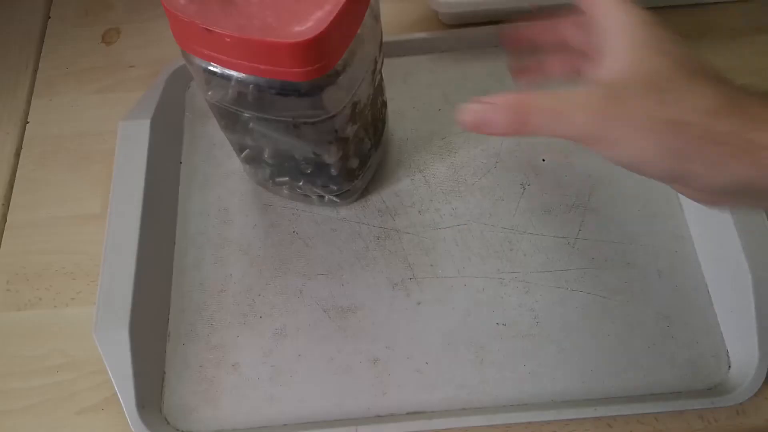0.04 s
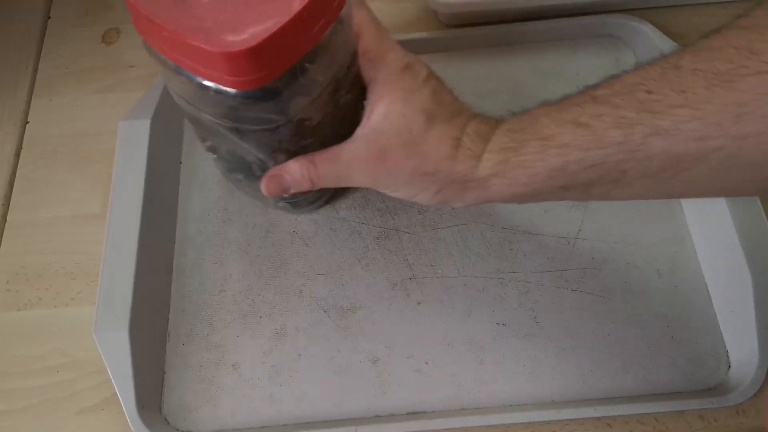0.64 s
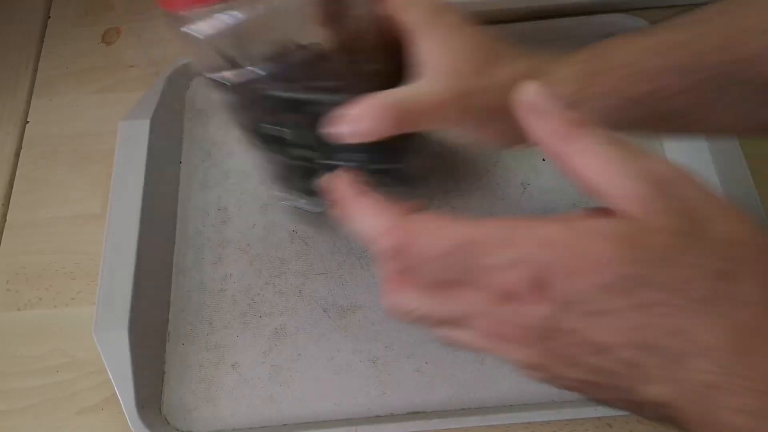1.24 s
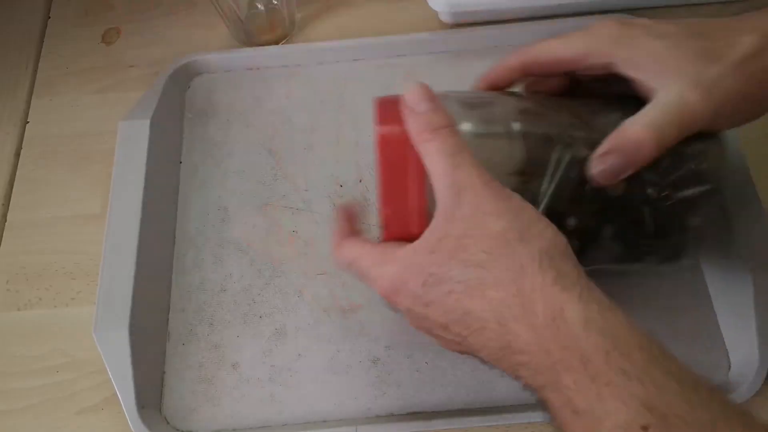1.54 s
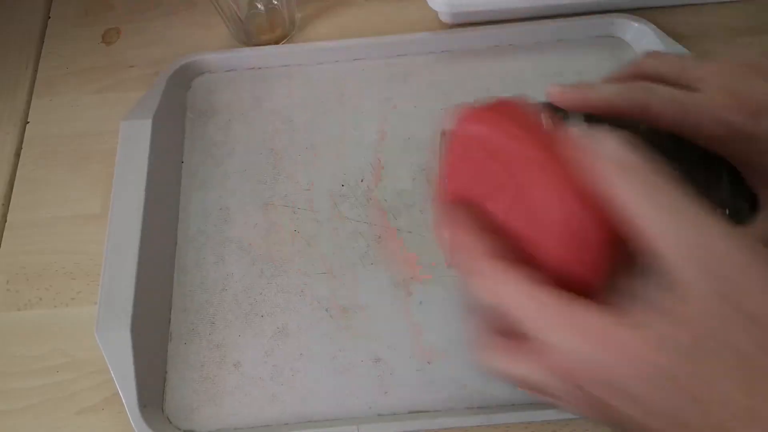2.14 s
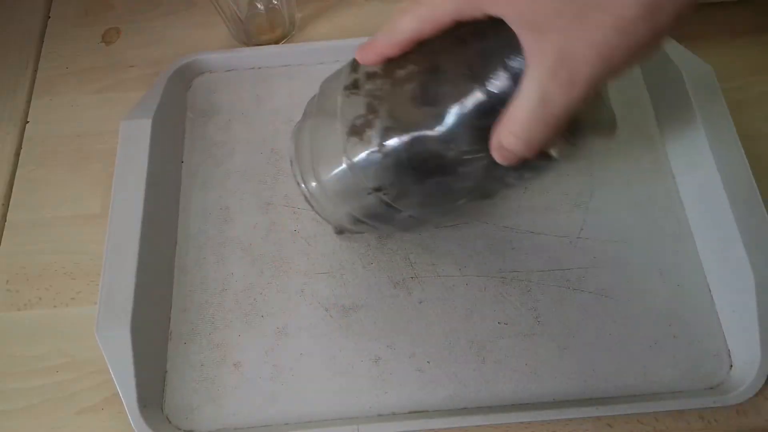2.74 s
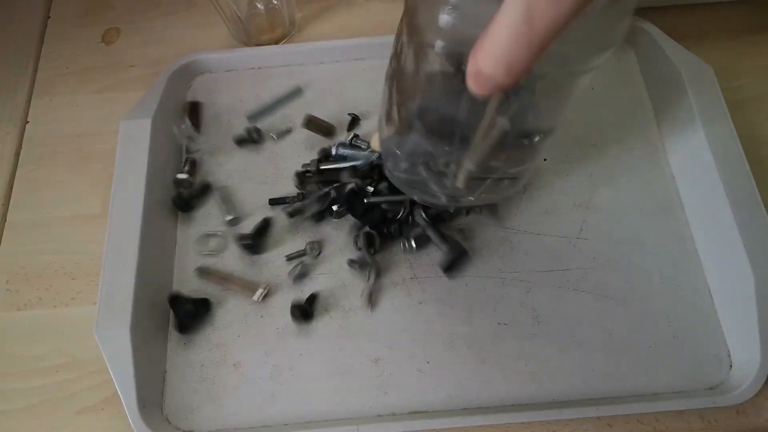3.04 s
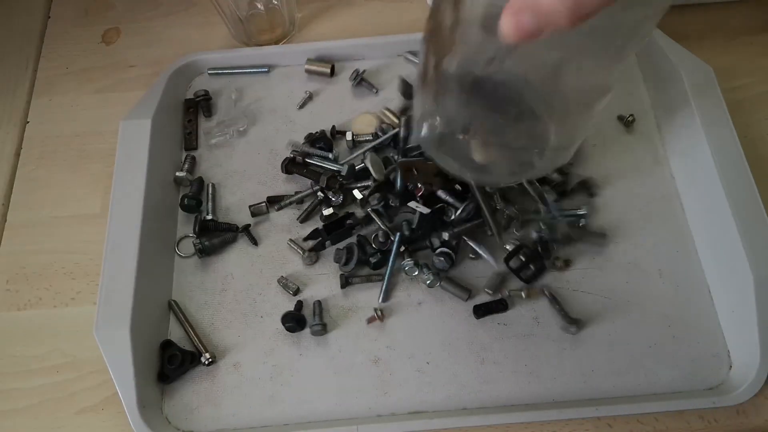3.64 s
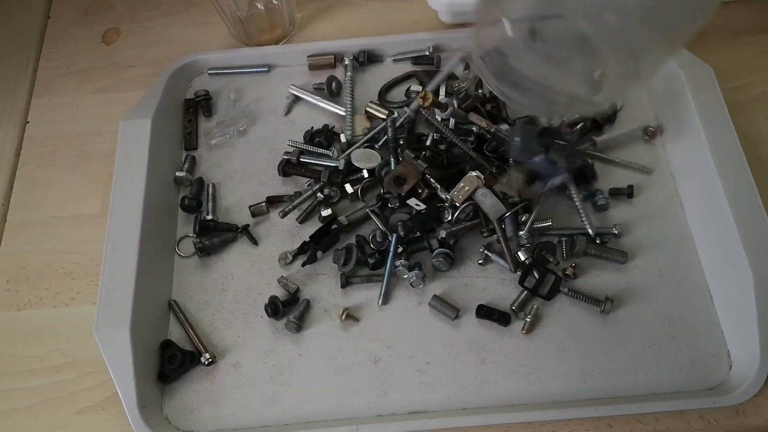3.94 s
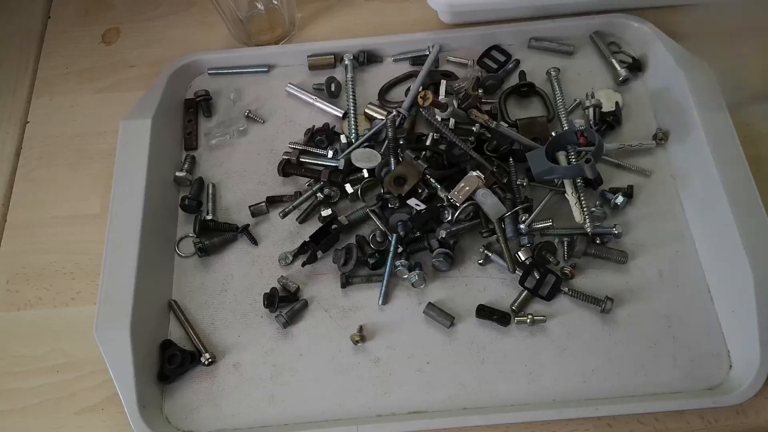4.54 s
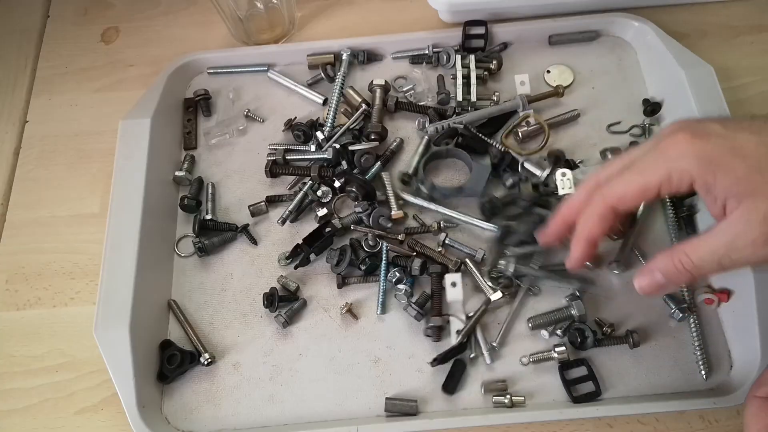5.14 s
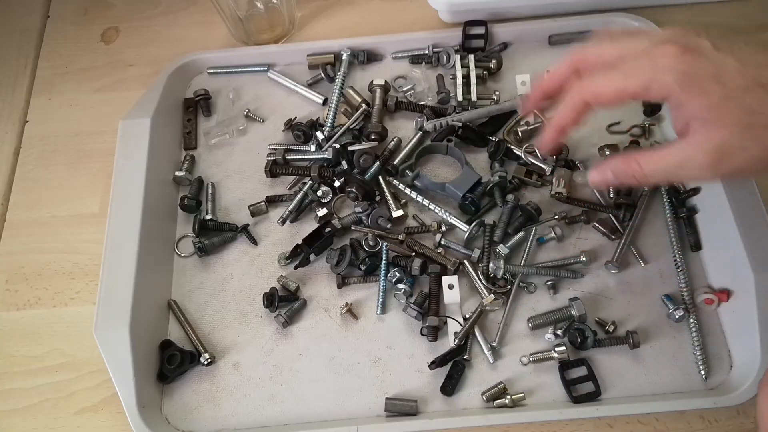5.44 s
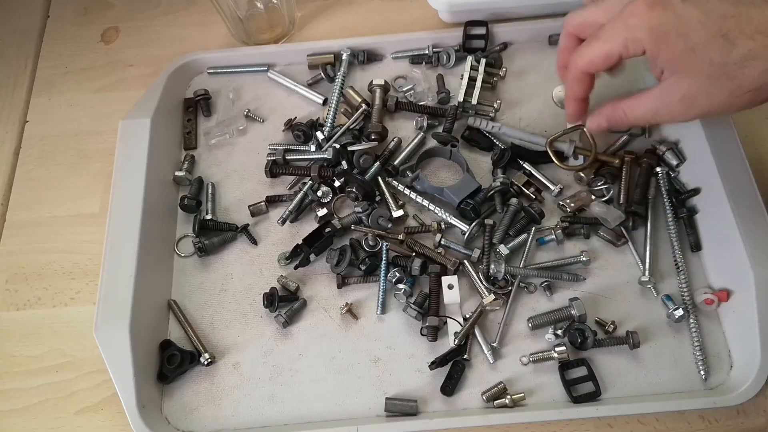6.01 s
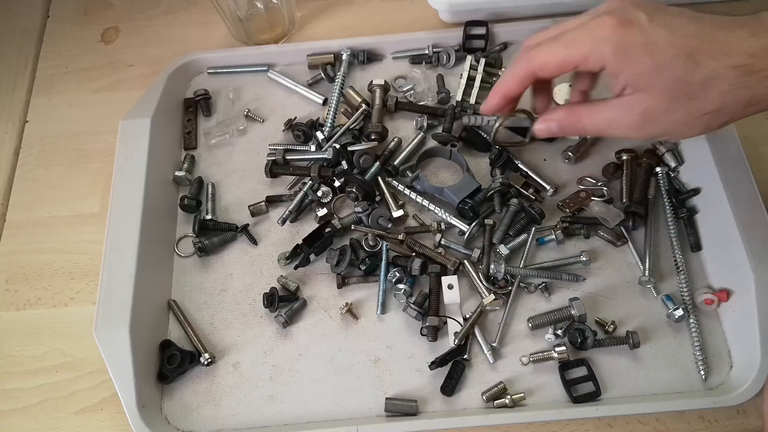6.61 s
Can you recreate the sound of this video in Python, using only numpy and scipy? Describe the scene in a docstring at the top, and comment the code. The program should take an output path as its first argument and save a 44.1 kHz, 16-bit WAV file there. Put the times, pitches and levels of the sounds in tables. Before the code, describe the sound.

Heard close up in a small, echoing room, a plastic jar full of metal hardware is handled with faint grating, clicks and hollow bumps. The contents then spill onto a plastic tray in a dense, jingling rush, the loudest part, which thins to a few last pieces dropping. A short pause follows before fingers push through the pile, making separate rattles, sharp clicks and the thin ring of loose bolts and washers.

```python
"""In a small, echoing room, a plastic jar of screws is gripped, tipped over, opened and poured
onto a plastic tray; a hand then stirs the heap. Countless small collisions tick in the metal
and knock on jar and tray, and now and then a free bolt or washer rings.
The sound is close and mono, and a limiter holds down the loudest part of the pour."""
import sys
import numpy as np
from scipy import signal
from scipy.fft import rfft, irfft
from scipy.io import wavfile
from scipy.ndimage import uniform_filter1d, minimum_filter1d

SR = 44100
rng = np.random.default_rng(int(sys.argv[2]) if len(sys.argv) > 2 else 0)


def transcribe(signal):
    """Save signal, clipped to [-1, 1], as a 16-bit WAV file at the path in sys.argv[1]."""
    frames = np.atleast_2d(signal).T
    limited = np.clip(frames, -1, 1)
    pcm = np.round(limited * 32767).astype(np.int16)
    wavfile.write(sys.argv[1], SR, pcm)


N = 302967
T = np.arange(N) / SR
POUR_S, STIR_S = 2.76, 4.7  # the screws leave the jar; the tray lies covered

# tone colour of clicking steel: (frequency [Hz], level [dB])
STEEL_TONE = [(500, -22), (1500, -11), (2800, -7.5), (4500, -7.5), (6800, -6), (8200, -4.5), (9350, 1),
              (10400, -6), (12000, -11.5), (14200, -14), (15000, -17.5), (15450, -7), (15900, -28.5),
              (16500, -13)]
# tone colours of a knock on the jar, the bare tray and the covered tray: (frequency [Hz], level [dB])
JAR_TONE = [(100, -55), (300, -29.5), (560, 1.5), (760, 4), (930, 1), (1150, 1.5), (1500, -1.5), (2100, -6),
            (3200, -5), (8000, -21.5)]
BARE_TRAY_TONE = [(100, -27), (300, -15.5), (560, -9.5), (650, 0), (736, -1), (810, -6.5), (887, -2),
                  (970, -2.5), (1065, -1), (1420, -3.5), (1700, -6), (2500, -3.5), (4000, -2.5),
                  (8000, -21)]
FULL_TRAY_TONE = [(100, -46), (300, -7), (560, -7), (800, -1.5), (1050, -1), (1700, -2), (2500, -2),
                  (4000, -8.5), (8000, -27)]


def screws(metal_db, knock_db, weight_db, loose_db=-44, sliding_db=-54):
    """The same collisions tick in the steel, knock on the plastic and make it rumble."""
    # low tones of jar, bare tray and covered tray under the load: (frequency [Hz], level [dB])
    jar_low = [(25, -15), (70, -22), (150, -27), (210, -10.5), (275, -6), (350, 2), (470, -6), (700, -10),
               (1500, -33.5)]
    bare_tray_low = [(25, -14.5), (60, -8), (150, -8), (200, -1.5), (234, 3.5), (285, -4), (370, 4),
                     (450, 3), (700, -12.5), (1500, -40)]
    full_tray_low = [(25, -9), (100, -13.5), (220, -3), (290, -12), (350, 7.5), (460, 3.5), (700, -23),
                     (1500, -31)]
    energy = collisions(metal_db)
    steel_power, knock_power = amp(metal_db) ** 2, amp(knock_db) ** 2
    # packed screws only grate; they ring once they tumble loose
    loose = np.minimum(1, amp(metal_db - loose_db))
    ringing = amp(1.5) * loose * clinks(energy * steel_power, t60=.04, low_hz=7500, high_hz=16000)
    clacking = amp(-4) * clinks(energy * knock_power, t60=.03, low_hz=700, high_hz=2200)
    # gentle motion is a smooth rub; harder motion breaks into collisions
    grainy = np.minimum(1, amp(metal_db - sliding_db))
    friction = grainy * energy + 1 - grainy
    ticks = amp(-4.5) * (fading_noise(friction * steel_power, t60=.008) + ringing)
    knocks = amp(-4.5) * (fading_noise(friction * knock_power, t60=.012) + clacking)
    # the heavy load blurs many collisions into one uneven push
    pushes = amp(-5.5) * fading_noise(friction, t60=0.023) * amp(weight_db)
    rumble = plastic(pushes, jar_low, bare_tray_low, full_tray_low)
    return colour(ticks, STEEL_TONE) + plastic(knocks) + rumble


def collisions(level_db, busiest_per_s=2000, spread_db=2.0, thinning=.15):
    """The energy of each collision; the louder the heap, the more screws collide."""
    per_s = busiest_per_s * amp(thinning * (level_db - level_db.max()))
    strength = amp(spread_db * np.minimum(rng.exponential(1, N), 4))
    energy = strength ** 2 * (rng.random(N) < per_s / SR)
    # the screws share the energy that the hand puts in
    average = uniform_filter1d(uniform_filter1d(energy, size=1100), size=700)
    return energy / (abs(average) + 0.37 * per_s / SR)


def fading_noise(energy, t60):
    """Each collision wakes many tones, heard as noise that fades by 60 dB in t60 seconds."""
    energy_left = amp(-120 / (t60 * SR))  # after one sample
    power = signal.lfilter([1 - energy_left], [1, -energy_left], energy)
    return rng.standard_normal(N) * np.sqrt(power)


def clinks(energy, t60, low_hz, high_hz):
    """About half the collisions ring one short tone, set by the piece and the spot it strikes."""
    out, t = np.zeros(N), np.arange(2500) / SR
    chance, spot, freedom = rng.random((3, N))
    for i in np.flatnonzero((energy > 0) & (chance < .5)):
        hz = low_hz + (high_hz - low_hz) * spot[i]
        ring_s = t60 * (.5 + freedom[i])
        tone = np.sin(2 * np.pi * hz * t) * amp(-60 * t / ring_s)
        add(out, i / SR, np.sqrt(energy[i] / np.sum(tone ** 2)) * tone)
    return out


def motion(faint_rub_db=-88):
    """Levels of metal, knocking and weight (dB) as the screws are shifted, poured and stirred."""
    # the load slides in the jar: (time [s], length [s], metal [dB], knocking [dB], weight [dB])
    jar_shifts = [(.17, 0.2, -73, -88, -88), (.392, 0.047, -53, -61.5, -59.5), (.50, 0.19, -65, -87, -84),
                  (.725, 0.097, -60, -73, -72), (.89, 0.022, -64.5, -66.5, -72), (.98, 0.13, -70, -93, -86),
                  (1.11, 0.023, -59.5, -66.5, -69), (1.20, 0.042, -56.5, -67, -64.5),
                  (1.365, 0.053, -54, -63.5, -73), (1.45, 0.016, -45.5, -45.5, -50.5),
                  (1.565, 0.0064, -50.5, -49.5, -49), (1.64, 0.17, -48.5, -58.5, -53),
                  (1.785, 0.14, -40, -49.5, -46), (1.99, 0.034, -36, -50, -44.5),
                  (2.10, 0.058, -45.5, -63, -62), (2.17, .04, -46.5, -56, -52.5),
                  (2.24, 0.076, -42, -53, -50.5), (2.46, 0.1, -53.5, -67.5, -60.5),
                  (2.60, 0.14, -46, -57, -55)]
    # the heap is pushed on the tray: (time [s], length [s], metal [dB], knocking [dB], weight [dB])
    tray_stirs = [(4.52, .11, -65.5, -72.5, -74), (4.97, 0.028, -46.5, -51.5, -68),
                  (5.06, 0.23, -35, -41, -55), (5.385, 0.0084, -45, -50.5, -58),
                  (5.54, 0.0065, -67, -63.5, -82), (5.78, 0.11, -35.5, -44.5, -60),
                  (6.005, 0.011, -41, -52.5, -59), (6.305, 0.016, -39.5, -47, -67),
                  (6.51, .012, -57, -54.5, -67), (6.635, .03, -54, -61, -53), (6.705, .008, -49, -62, -70),
                  (6.86, .01, -69, -59, -65)]
    shifting = hand_moves(jar_shifts, rise_db_per_s=473, rest_db_per_s=193)
    stirring = hand_moves(tray_stirs, rise_db_per_s=644, rest_db_per_s=326)
    return 10 * np.log10(shifting + pour() + stirring + amp(faint_rub_db) ** 2)


def pour(rise_db_per_s=600, rest_db_per_s=30):
    """Power of metal, knocking and weight in the stream of screws."""
    # the screws leave the jar in two surges: (time [s], metal [dB], knocking [dB], weight [dB])
    stream = [(2.755, -43, -47, -52), (2.78, -36, -38, -39), (2.87, -24.5, -28, -35),
              (3.0, -22.5, -31, -36), (3.15, -27.5, -30.5, -44), (3.26, -32.5, -36.5, -46.5),
              (3.34, -32, -37, -46), (3.39, -42, -41, -60.5), (3.443, -28, -36, -46.5),
              (3.62, -24.5, -30.5, -40.5), (3.85, -26, -32.5, -43.5), (3.93, -33, -38.5, -50.5),
              (4.02, -36.5, -44, -57), (4.15, -42.5, -42, -56), (4.24, -64, -64, -63),
              (4.34, -70.5, -73, -80)]
    times, *levels_db = np.transpose(stream)
    before, after = np.maximum(times[0] - T, 0), np.maximum(T - times[-1], 0)
    fade_db = -rise_db_per_s * before - rest_db_per_s * after
    return amp([np.interp(T, times, db) + fade_db for db in levels_db]) ** 2


def hand_moves(rows, rise_db_per_s, rest_db_per_s, sag_db_per_s=4.5):
    """Power of metal, knocking and weight as each move swells, sags a little and comes to rest."""
    power = np.zeros((3, N))
    for s, length, *levels_db in rows:
        before, after = np.maximum(s - T, 0), np.maximum(T - s - length, 0)
        during = np.clip(T - s, 0, length)
        shape = amp(-rise_db_per_s * before - sag_db_per_s * during - rest_db_per_s * after)
        power += np.outer(amp(levels_db), shape) ** 2
    return power


def hard_hits(other_end_s=.003, other_end_db=-4.5):
    """A heavy piece lands: a bright click and a slightly longer knock."""
    # single hard landings: (time [s], metal click [dB], knock on the plastic [dB])
    landings = [(.377, -49, -56), (.483, -44.5, -67), (.709, -50, -62), (1.13, -66, -58),
                (1.318, -45.5, -60), (1.369, -65, -56), (1.4043, -35.5, -31.5), (1.552, -31.5, -51),
                (1.652, -42, -60), (1.770, -28.5, -42.5), (1.86, -32, -38.5), (2.037, -40, -58),
                (2.161, -36.5, -61), (2.224, -27.5, -39.5), (2.493, -35.5, -61), (2.594, -36.5, -45),
                (2.762, -27.5, -38), (3.120, -21, -37), (3.971, -23.5, -50), (4.053, -29, -34.5),
                (4.097, -25, -58), (4.138, -29.5, -39.5), (4.205, -35, -43), (4.273, -44.5, -46),
                (4.876, -55.5, -86), (4.916, -47, -57), (4.96, -42, -53), (5.037, -36, -48),
                (5.056, -26, -41.5), (5.372, -48, -42), (5.379, -31, -45.5), (5.524, -36.5, -64),
                (5.728, -47.5, -48.5), (5.752, -38, -44), (5.779, -29, -35), (5.841, -28, -57),
                (5.9943, -31.5, -44.5), (6.277, -53, -51), (6.294, -39, -42), (6.499, -45, -56),
                (6.604, -27, -34.5), (6.652, -27.5, -35), (6.701, -36.5, -41.5), (6.763, -37.5, -38.5),
                (6.810, -49, -60)]
    clicks, knocks = np.zeros((2, N))
    for s, click_db, knock_db in landings:
        ends = [(s, 0)]
        if s > POUR_S:  # on the tray a screw lands on one end, then on the other
            ends.append((s + other_end_s, other_end_db))
        for at, end_db in ends:
            add(clicks, at, amp(click_db + end_db) * contact(t60=0.024))
            add(knocks, at, amp(knock_db + end_db) * contact(t60=0.039))
    return amp(-2.5) * colour(clicks, STEEL_TONE) + amp(-0.5) * plastic(knocks)


def contact(t60, rise_s=0.00063):
    """One hard touch: a burst of noise that swells in a moment and dies away."""
    t = np.arange(2048) / SR
    return rng.standard_normal(len(t)) * amp(-60 * t / t60) * (1 - np.exp(-t / rise_s))


def rings(metal_db, touches_per_s=500, first_blow=1.3, touch_t60=.07):
    """A loose piece is struck, then chatters on its neighbours; each touch rings its note again."""
    # bolts, washers and the hollow jar ring: (time [s], pitch [Hz], level [dB], rattle time [s])
    clear_rings = [(1.447, 1155, -40, 0.19), (1.46, 2040, -43, 0.1), (1.83, 9060, -39, .27),
                   (1.84, 15460, -42, .35), (1.89, 12700, -41.5, 0.55), (2.11, 12940, -47, .45),
                   (2.172, 9200, -35, 0.26), (2.201, 8000, -35, .04), (2.228, 573, -42, 0.15),
                   (2.585, 363, -54.5, .45), (2.655, 7940, -46, .25), (2.88, 9490, -31, .4),
                   (3.109, 9470, -26, 0.24), (3.171, 14211, -32, .34), (3.21, 13738, -40, .45),
                   (3.46, 11980, -36, 0.41), (3.56, 14100, -30, .36), (3.595, 14300, -36, .22),
                   (3.70, 12850, -33, .25), (3.731, 13800, -31, .46), (3.809, 13920, -33, .49),
                   (3.919, 13700, -31.5, .36), (4.049, 7560, -36, .15), (4.096, 9900, -26, 0.037),
                   (4.519, 490, -61.5, 0.17), (5.236, 12800, -38, .25), (5.279, 8330, -42.5, 0.34),
                   (5.752, 12000, -35, 0.094), (5.804, 8640, -28.5, .24), (5.839, 8690, -23, 0.25),
                   (5.84, 12900, -32.5, .24), (6.304, 6790, -43.5, 0.26), (6.307, 8710, -38.5, 0.2),
                   (6.39, 12930, -55, .35), (6.50, 8660, -52, 0.17), (6.604, 7600, -33.5, 0.093),
                   (6.604, 14300, -44, .18)]
    out, t = np.zeros(N), np.arange(SR // 3) / SR
    for s, hz, db, rattle_s in clear_rings + chance_rings(metal_db):
        touches = rng.standard_normal(len(t)) * (rng.random(len(t)) < touches_per_s / SR)
        touches[0] = first_blow
        fade = amp(-60 * t / rattle_s)
        # this filter turns each touch into a fading tone
        pole = amp(-60 / (touch_t60 * SR)) * np.exp(2j * np.pi * hz / SR)
        tone = signal.lfilter([1], [1, -pole], touches * fade).imag
        add(out, s, amp(db) * tone * np.linalg.norm(fade) / np.linalg.norm(tone))
    return amp(-2) * out


def chance_rings(metal_db, start_s=1.65, per_s=9, rattle_s=.2):
    """Picks which free pieces ring, and when, once the jar lies on its side."""
    # notes of bolts and washers: (pitch [Hz], level against the moving metal [dB])
    notes = [(7940, -8.5), (9043, -9.5), (9400, -2), (11033, -14), (11984, -11), (12850, -11), (13738, -10),
             (13950, -8), (14216, -10), (15460, -8)]
    slots = np.arange(start_s, T[-1], 1 / per_s)
    rows = []
    for slot, (delay, piece) in zip(slots, rng.random((len(slots), 2))):
        s = slot + delay / per_s
        hz, db = notes[int(piece * len(notes))]
        # a piece rings loudly only if its neighbours keep moving
        moving_db = np.interp([s, s + rattle_s / 4], T, metal_db).min()
        rows.append((s, hz, db + moving_db, rattle_s))
    return rows


def thumps(rise_s=0.00094):
    """A soft, heavy blow rings one low tone of the plastic."""
    # the full jar bumps hand and tray: (time [s], pitch [Hz], level [dB], fade time [s])
    blows = [(.40, 200, -54.5, 0.12), (.88, 187, -49.5, 0.077), (1.101, 198, -51.5, 0.05),
             (1.156, 201, -56, 0.09), (1.403, 209, -39.5, 0.077), (1.55, 203, -41, 0.047),
             (1.842, 366, -39, 0.046), (1.915, 365, -29, 0.078), (2.716, 433, -37, 0.056),
             (3.0, 228, -47.5, 0.12), (3.251, 229, -50, 0.7), (3.51, 241, -39, 0.5)]
    out, t = np.zeros(N), np.arange(SR // 2) / SR
    for s, hz, db, t60 in blows:
        shape = amp(db - 60 * t / t60) * (1 - np.exp(-t / rise_s))
        add(out, s, np.sin(2 * np.pi * hz * t) * shape)
    return out


def plastic(x, jar=JAR_TONE, bare_tray=BARE_TRAY_TONE, full_tray=FULL_TRAY_TONE):
    """Blows sound in the jar, then on the bare tray, then on the tray muffled by its load."""
    in_jar = colour(x * (T < POUR_S), jar)
    on_bare_tray = colour(x * (T >= POUR_S) * (T < STIR_S), bare_tray)
    on_full_tray = colour(x * (T >= STIR_S), full_tray)
    return in_jar + on_bare_tray + on_full_tray


def room(x, spots, first_echo_s=0.003, echoes_per_s=4000, hold_samples=300):
    """The walls echo; the sound hops between spots on the tray, each with its own echoes."""
    # how long the echoes take to fade by 60 dB: (frequency [Hz], fade time [s])
    fade_times = [(200, 0.43), (700, 0.23), (2000, 0.4), (5000, 0.33), (10000, 0.29), (16000, 0.34)]
    out = np.zeros(N)
    spot = np.repeat(rng.integers(0, spots, N // hold_samples + 1), hold_samples)[:N]
    for k in range(spots):
        echoes = rng.choice([-1, 1], SR // 2) * (rng.random(SR // 2) < echoes_per_s / SR)
        echoes[:round(first_echo_s * SR)] = 0
        hz, t, bands = signal.stft(echoes, SR, nperseg=256)
        tail = signal.istft(bands * amp(-60 * t / curve(fade_times, hz)[:, None]), SR)[1]
        share = np.sqrt(abs(uniform_filter1d((spot == k) * 1., size=hold_samples)))
        out += signal.oaconvolve(x * share, tail / np.linalg.norm(tail))[:N]
    return out


def background(level_db=-68.5):
    """Steady low rumble and faint hiss."""
    # tone colour of the background: (frequency [Hz], level [dB])
    noise_tone = [(10, -17), (25, 7), (55, -11), (110, -9.5), (300, -23.5), (800, -26.5), (2000, -29.5),
                  (5000, -41), (9400, -30.5), (16000, -47)]
    hz = np.fft.rfftfreq(N, 1 / SR)
    noise = irfft(rfft(rng.standard_normal(N)) * amp(curve(noise_tone, hz)), N)
    return amp(level_db) * noise / np.sqrt(np.mean(noise ** 2))


def amp(db):
    """Turns decibels into a gain."""
    return 10 ** (np.asarray(db) / 20)


def curve(points, hz):
    """Joins (frequency, value) points with straight lines on a pitch scale."""
    point_hz, values = np.transpose(points)
    return np.interp(np.log(hz + 1), np.log(point_hz), values)


def add(mix, s, sound):
    """Mixes a sound in at s seconds."""
    part = mix[max(round(s * SR), 0):][:len(sound)]
    part += sound[:len(part)]


def colour(x, points, size=4096):
    """Gives a sound a tone colour, with a filter that rings only after each blow."""
    log_gain = np.log(amp(curve(points, abs(np.fft.fftfreq(size, 1 / SR)))))
    spectrum = np.exp(np.conj(signal.hilbert(log_gain)))
    taps = np.fft.ifft(spectrum).real[:size // 2]
    return signal.oaconvolve(x, taps / np.linalg.norm(taps))[:len(x)]


def scene():
    """Clatter and ringing in the room, the same in both channels."""
    metal_db, knock_db, weight_db = motion()
    clatter = screws(metal_db, knock_db, weight_db) + hard_hits()
    tones = rings(metal_db) + thumps()
    echoes = amp(-3) * room(clatter, spots=6) + amp(-6.5) * room(tones, spots=1)
    mono = clatter + tones + echoes + background()
    return np.array([mono, mono])


def record(dry, ceiling_db=-18.5, top_hz=16100):
    """A fast limiter holds the peaks down; then the highest treble is cut."""
    gain = np.minimum(1, amp(ceiling_db) / (abs(dry[0]) + 1e-9))
    gain = uniform_filter1d(minimum_filter1d(gain, size=65), size=65)
    lowpass = signal.firwin(511, top_hz, window=("kaiser", 9), fs=SR)
    return signal.oaconvolve(dry * gain, lowpass[None], "same")


dry = scene()
out = record(dry)
transcribe(out)
```